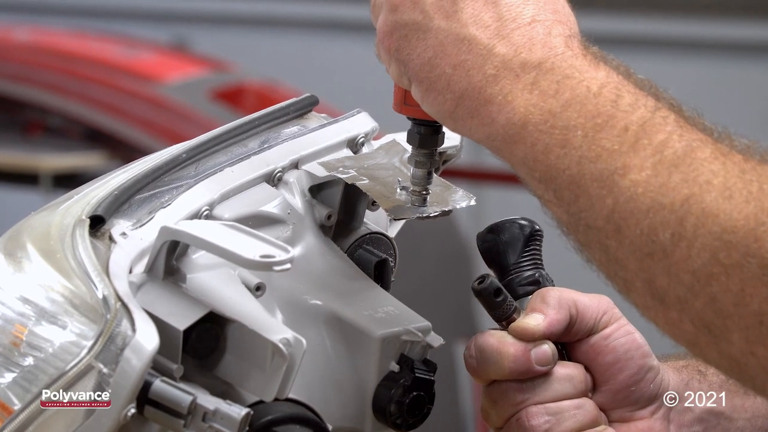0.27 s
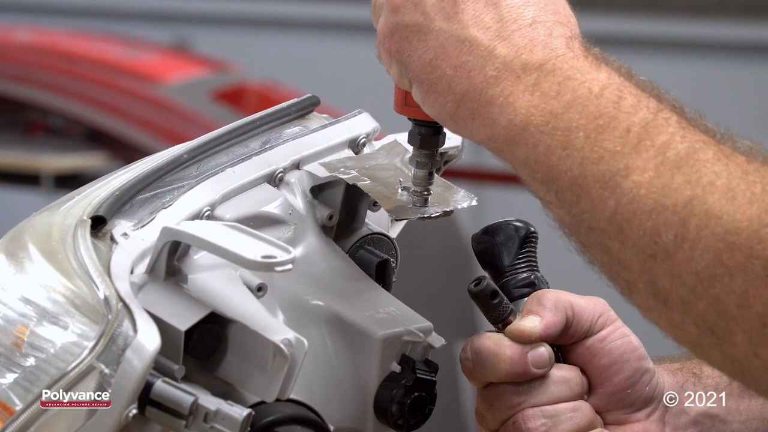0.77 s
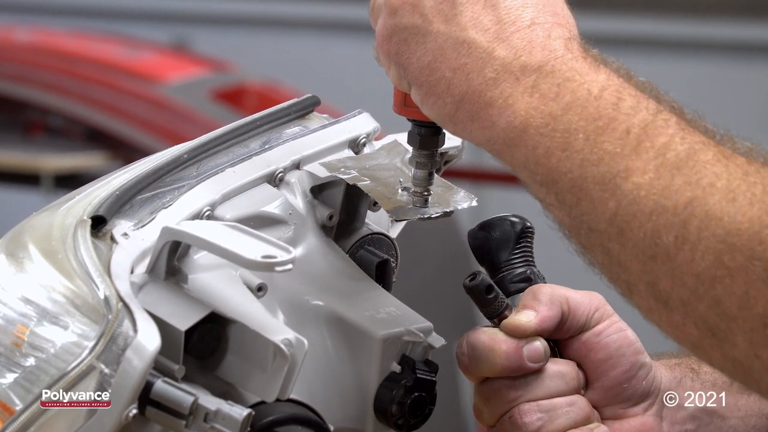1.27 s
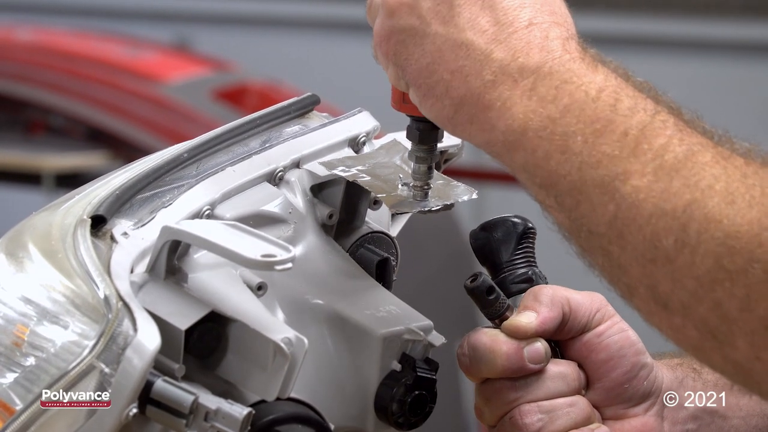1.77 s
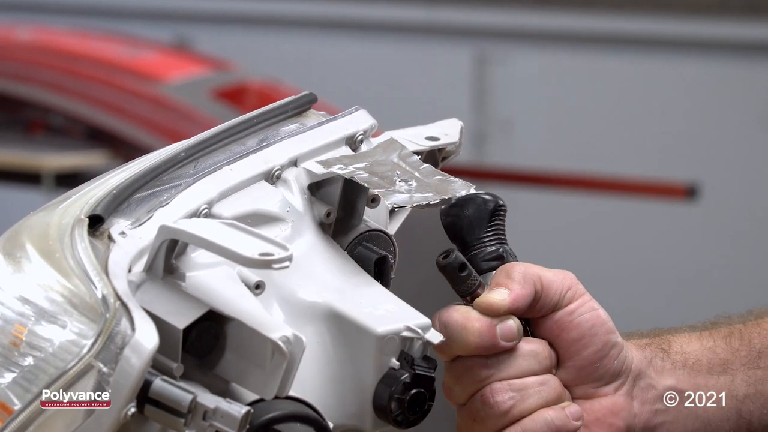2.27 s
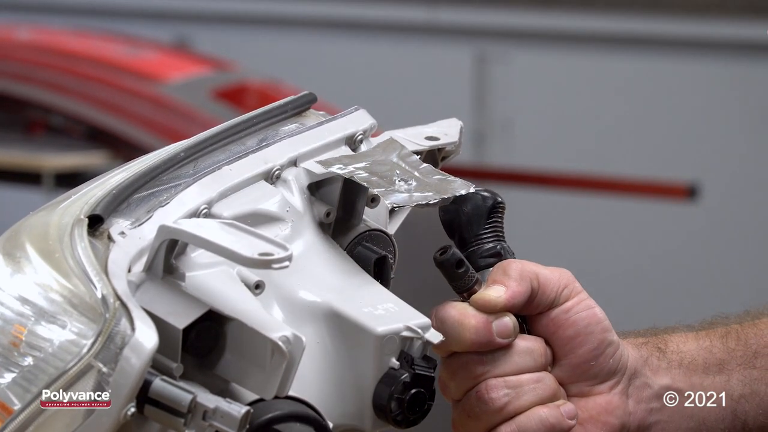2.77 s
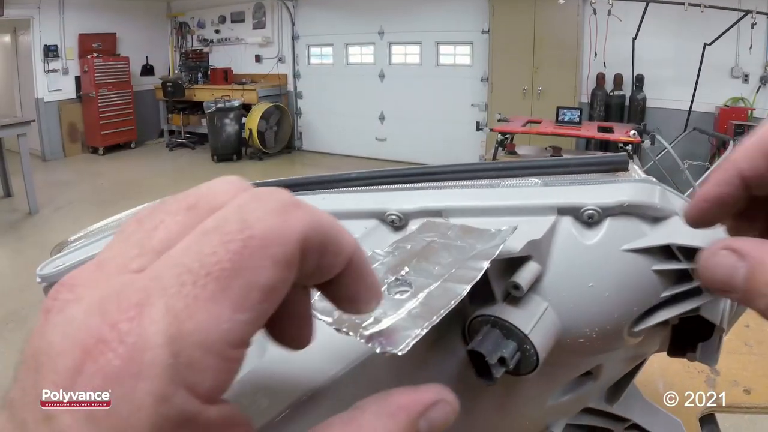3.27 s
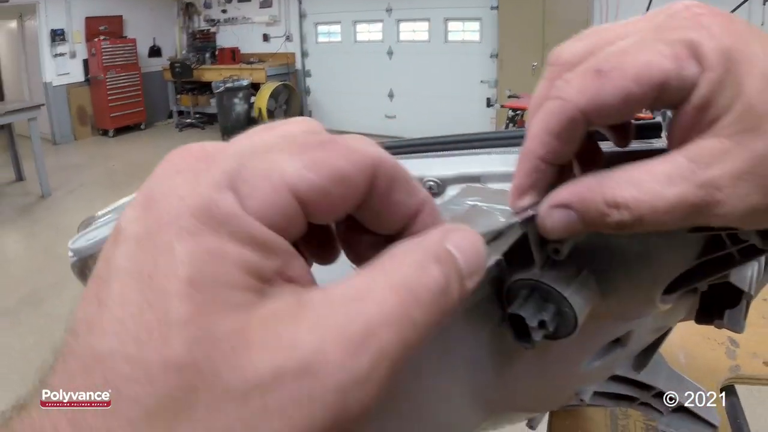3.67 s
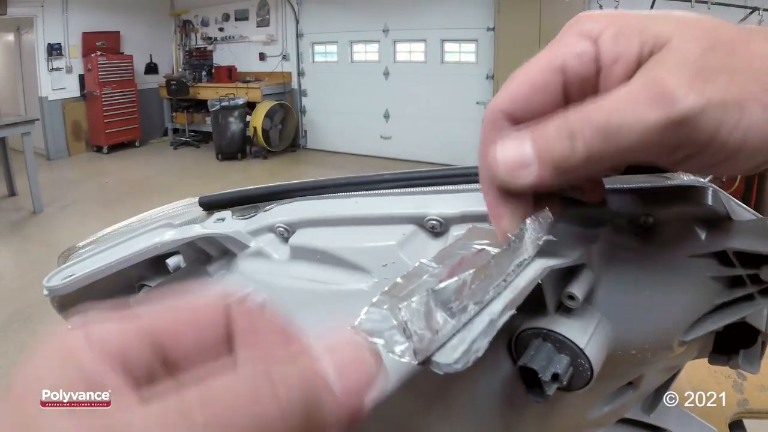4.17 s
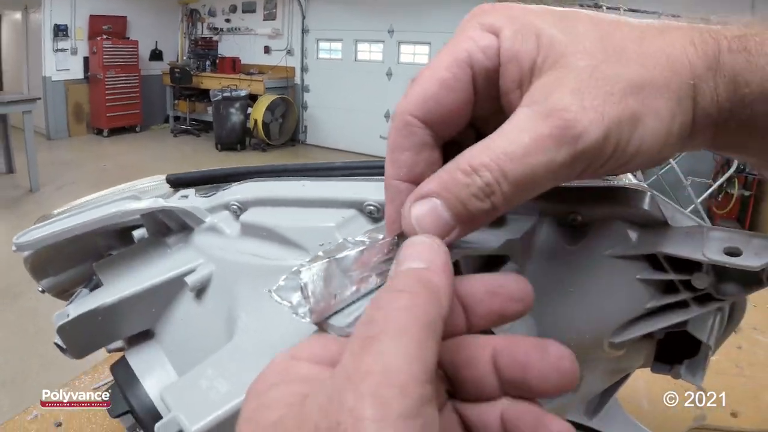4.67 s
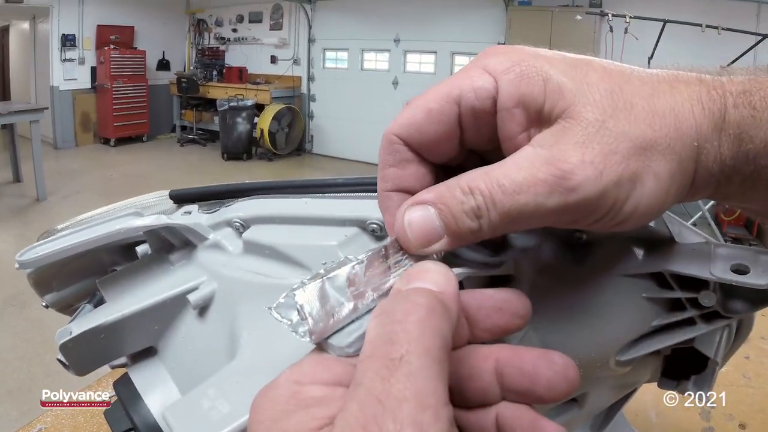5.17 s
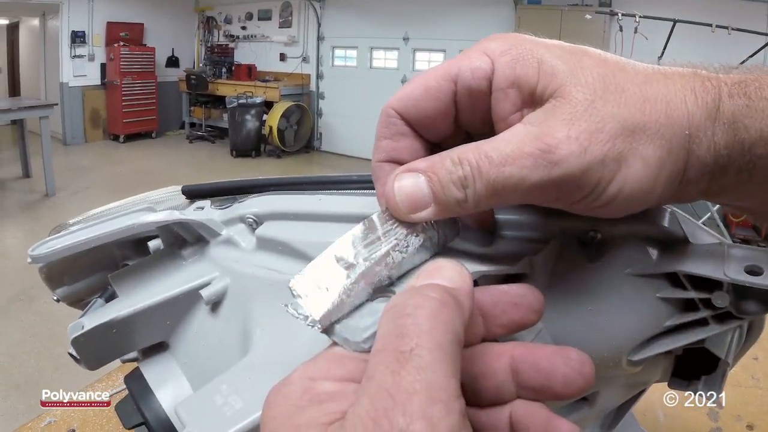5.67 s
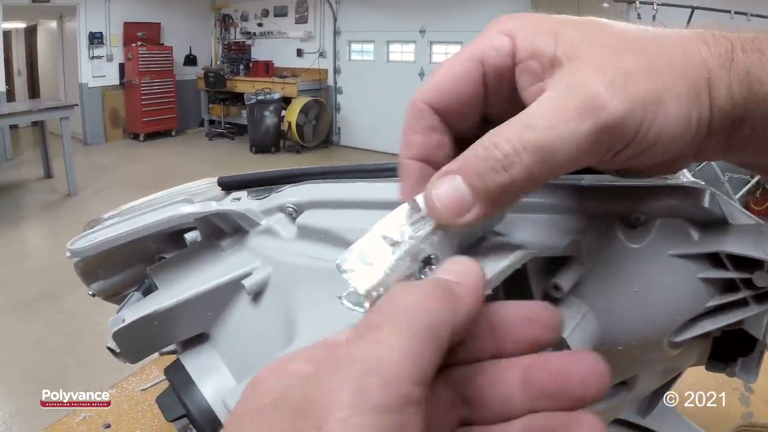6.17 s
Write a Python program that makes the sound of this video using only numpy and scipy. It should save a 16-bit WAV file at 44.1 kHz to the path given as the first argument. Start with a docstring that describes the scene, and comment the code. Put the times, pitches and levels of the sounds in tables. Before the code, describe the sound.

A blow gun sends a steady, high hiss of compressed air over a repair on a plastic housing, flaring brighter as the jet catches an edge. About halfway through, the hiss fades into the quieter rush and hum of workshop fans. Close by, fingers pick at foil, making a few sharp snaps, light knocks on the plastic and dull rubs. Near the end a fingertip scrapes briefly, followed by more small clicks.

```python
"""Compressed air hisses from a blow gun over a foil-backed repair on a plastic headlight housing;
the turbulent jet splashes on the repair and flares where it catches an edge.
At about 3 s the hiss fades into the steady rush and hum of a workshop's fans and machines.
Then fingers pick at the foil: it buckles in snaps, taps ring the housing's modes, hands rub it,
and near 6 s a fingertip scrapes along it by stick-slip friction."""
import sys
import numpy as np
from scipy import signal
from scipy.fft import rfft, irfft
from scipy.io import wavfile

SR = 44100
rng = np.random.default_rng(int(sys.argv[2]) if len(sys.argv) > 2 else 0)


def master(y):
    """Save y as 16-bit WAV."""
    cut = np.clip(np.atleast_2d(y).T, -1, 1)
    pcm = np.round(cut * 32767)  # scale
    wavfile.write(sys.argv[1], SR, pcm.astype(np.int16))


N = 284004
T = np.arange(N) / SR
HZ = np.fft.rfftfreq(N, 1 / SR)


def gain_of(db):
    """Amplitude ratio of a level in decibels."""
    return 10 ** (np.asarray(db) / 20)


def unit_rms(x):
    """Normalisation to rms 1."""
    return x / np.sqrt(np.mean(x ** 2) + 1e-20)


def colour(points):
    """Spectral envelope in dB, interpolated over log frequency."""
    hz, db = np.transpose(points)
    return np.interp(np.log(HZ + 1), np.log(hz), db)


def resonances(peaks, width_hz):
    """Narrow resonances as Lorentzian bumps on a dB spectrum."""
    return sum(db / (1 + (2 * (HZ - hz) / width_hz) ** 2) for hz, db in peaks)


def noise(spectrum_db):
    """Spectrally shaped Gaussian noise of rms 1."""
    return unit_rms(irfft(rfft(rng.standard_normal(N)) * gain_of(spectrum_db), N))


def drift(rate_hz):
    """Slow random modulation: low-pass noise of rms 1."""
    return noise(-10 * np.log10(1 + (HZ / rate_hz) ** 4))


def band(x, low_hz, top_hz):
    """A gentle Butterworth band-pass."""
    return signal.sosfilt(signal.butter(2, [low_hz, top_hz], "band", fs=SR, output="sos"), x)


def stroke(start_s, length_s, attack_s, release_s):
    """Smooth envelope within 0 to 1: attack from the start, release after the length."""
    edge = np.clip(np.minimum((T - start_s) / attack_s, 1 - (T - start_s - length_s) / release_s), 0, 1)
    return edge * edge * (3 - 2 * edge)


def add(mix, start_s, sound):
    """Superposition of a sound on the mix."""
    part = mix[round(start_s * SR):][:len(sound)]
    part += sound[:len(part)]


def ring(modes):
    """Impulse response as a sum of damped modes."""
    t = T[:SR // 8]
    return sum(gain_of(db - 60 * t / t60_s) * np.sin(2 * np.pi * hz * t) for hz, db, t60_s in modes)


def reflections(level_db, t60_s, top_hz, count=150):
    """Transfer function of the direct sound plus scattered, dulled echoes from 8 ms on."""
    delay_s = rng.random(count) * t60_s / 2
    sign = rng.choice([-1, 1], count)
    echoes = np.zeros(N)
    echoes[((delay_s + .008) * SR).astype(int)] = sign * np.exp(-np.log(1000) * delay_s / t60_s)
    return 1 + gain_of(level_db) * rfft(echoes) / np.linalg.norm(echoes) / (1 + 1j * HZ / top_hz)


def side_rumble(level_db=-76.5):
    """Faint low noise that gives width when fed to the two channels in antiphase."""
    return noise(colour([(10, -6), (30, -2), (100, -14), (400, -32), (1200, -41.5)])) * gain_of(level_db)


def motor_hum():
    """Motor tones waver by random phase and amplitude modulation."""
    # hum partials: pitch_hz, level_db
    partials = [(87, -67), (179, -70.5), (339, -69.5)]
    hum = np.zeros(N)
    for hz, db in partials:
        tone = unit_rms(np.cos(2 * np.pi * hz * T + 1.6 * drift(rate_hz=4.3)))
        hum += gain_of(db) * tone * gain_of(1.7 * drift(rate_hz=5))
    return hum


def fans(rest_db=-45.5):
    """Broadband noise of fans and machines, coloured by resonances and echoes, slowly swelling."""
    # spectrum of the rush: frequency_hz, density_db
    spectrum = [(8, -18), (24, -2.5), (140, -3.5), (330, -1), (500, -4), (640, -3), (950, 1.5),
                (1400, -1.5), (2400, 2), (2800, -3), (3400, -.5), (4600, -7.5), (9000, -15.5),
                (12000, -19.5), (15800, -19)]
    # its narrow resonances: frequency_hz, lift_db
    peaks = [(444, 7), (495, 4), (791, 3.5), (937, 3.5), (1002, -2), (1175, 5.5), (1214, 2.5), (1478, 6.5),
             (1672, 7), (1811, 4), (1890, 6.5), (2159, 1), (2288, 4.5), (2358, 5.5), (2396, 6.5), (2436, 5),
             (2770, 0), (3068, 10.5), (3243, 6.5), (3305, 4), (3480, 5), (3529, 5), (3739, -1), (3916, 6.5),
             (4810, 6.5)]
    # its swells, which may overlap: start_s, length_s, lift_db
    swells = [(3.25, 1.27, 2.5), (3.8, 0.68, 1.75), (4.78, 0.59, 2.5), (5.706, 0.8, 3)]
    echoes_db = 20 * np.log10(abs(reflections(level_db=-7.5, t60_s=.2, top_hz=4030)))
    rush = noise(colour(spectrum) + resonances(peaks, width_hz=14.4) + echoes_db) * gain_of(rest_db)
    swell_db = sum(db * stroke(s, length, attack_s=0.38, release_s=0.17) for s, length, db in swells)
    # the midrange swells most; rumble and top hiss follow only in part
    middle = irfft(rfft(rush) / (1 + (np.log(HZ / 1700 + 1e-9) / 1.1) ** 4), N)
    rush = middle * gain_of(swell_db) + (rush - middle) * gain_of(0.3 * swell_db)
    return rush * gain_of(0.35 * drift(rate_hz=20))


def hand_rubs():
    """Sliding friction of hands on the housing: dull, uneven noise that follows the pressure."""
    # spectrum of a rub: frequency_hz, density_db
    spectrum = [(60, -12), (170, -12), (260, -4), (380, -3), (500, 5.5), (650, -11), (1050, -7),
                (1600, -15), (4000, -34)]
    # hand movements: start_s, length_s, level_db
    rubs = [(3.777, 0.11, -54), (4.14, 0.44, -60), (5.25, 0.1, -54), (6.045, 0.058, -45.5),
            (6.1, 0.22, -58)]
    pressure = sum(gain_of(db) * stroke(s, length, attack_s=0.058, release_s=0.086)
                   for s, length, db in rubs)
    return noise(colour(spectrum)) * pressure * gain_of(drift(rate_hz=34))


def fingertip_scrape(slips_per_s=900, level_db=-41.5):
    """Stick-slip friction: random slips excite the housing as a fingertip presses, then slides off."""
    # resonances of the scrape: frequency_hz, width_hz, gain_db
    peaks = [(870, 230, -0.5), (988, 91, -5), (1266, 88, -3), (1915, 130, -1.5), (2090, 220, -3)]
    slips = rng.standard_normal(N) * (rng.random(N) < slips_per_s / SR)
    body = sum(gain_of(db) / (1 + 2j * (HZ - hz) / width) ** 2 for hz, width, db in peaks)
    pressure = stroke(start_s=5.915, length_s=0.14, attack_s=0.09, release_s=0.13)
    return unit_rms(irfft(rfft(slips) * body, N)) * gain_of(level_db) * pressure


def housing_taps():
    """Impacts excite the plastic shell's modes; a softer contact low-passes the blow."""
    # modes of the housing: frequency_hz, relative_db, t60_s
    modes = [(535, -24, 0.062), (810, -24, 0.027), (1093, 3, 0.025), (1440, 0.5, 0.018), (1920, 4.5, 0.014),
             (2300, 3.5, 0.02), (6500, -5, .008), (9300, -13, .006)]
    # finger knocks: start_s, peak_db, cutoff_hz
    taps = [(4.065, -18.5, 5000), (4.071, -30, 1200), (4.1825, -34, 2000), (4.1866, -28, 1500),
            (4.3294, -24.5, 1200), (6.0497, -30, 6000), (6.0705, -33, 1200), (6.0922, -46, 5000),
            (6.0932, -20, 1000)]
    body = band(ring(modes), low_hz=600, top_hz=12000)  # a thin shell radiates little bass
    out = np.zeros(N)
    for start_s, peak_db, cutoff_hz in taps:
        pole = np.exp(-2 * np.pi * cutoff_hz / SR)
        knock = signal.lfilter([1 - pole], [1, -pole], body)
        add(out, start_s, gain_of(peak_db) * knock / abs(knock).max())
    return out


def foil_snaps():
    """Buckling of the peeled foil excites bright, heavily damped modes."""
    # modes of the foil: frequency_hz, relative_db, t60_s
    modes = [(1700, -27, 0.004), (2520, -19, 0.0037), (3900, 1, 0.0076), (5000, 5.5, 0.0033),
             (5400, -15, 0.012), (5960, -5, 0.017), (6260, 0, 0.0059), (8080, 2.5, 0.0056),
             (8900, -20, .014), (9600, -20, .003)]
    # buckling events: start_s, peak_db
    snaps = [(3.598, -41), (4.0647, -33), (4.3247, -21), (4.329, -11.5), (4.3297, -13.5), (4.3305, -24),
             (4.4055, -31.5), (5.066, -39), (5.903, -39), (6.092, -27.5), (6.0933, -30), (6.2798, -32),
             (6.424, -31)]
    snap = band(ring(modes), low_hz=815, top_hz=9600)
    out = np.zeros(N)
    for start_s, peak_db in snaps:
        add(out, start_s, gain_of(peak_db) * snap / abs(snap).max())
    return out


def flutter(drive_db=-51.0, decay_s=0.0012):
    """A band-limited pulse train: faint, soft ticks under the hiss, one in five coming early."""
    timing, sizes, sides = rng.random((80, 3)).T
    times_s = np.cumsum(np.where(timing < .2, .032, .0427))
    tick = np.exp(-T[:SR // 30] / decay_s)
    out = np.zeros(N)
    for start_s, size, side in zip(times_s, sizes, sides):
        add(out, start_s, np.sign(side - .5) * tick * gain_of(drive_db + 2.6 * size))
    return band(out, low_hz=78, top_hz=850)


def free_jet(hollows_db, flare_db):
    """Turbulent mixing noise: a rush coloured by the housing's hollows, and a high nozzle hiss."""
    # spectrum of the rush: frequency_hz, density_db
    rush_spectrum = [(20, -50), (70, -32.5), (300, -33.5), (550, -24.5), (700, -24.5), (860, -18),
                     (1150, -19), (1600, -10.5), (2050, -6.5), (2450, 0), (3200, 0.4), (3550, -3.5),
                     (4150, -4.5), (4700, -46)]
    # spectrum of the nozzle hiss: frequency_hz, density_db
    nozzle_spectrum = [(7000, -31.5), (10500, -10), (11500, -7.5), (12600, -4), (13700, 1.5), (15850, 0),
                       (16200, -50)]
    # course of the jet: time_s, rush_relative_db, nozzle_relative_db
    course = [(0.0, -41, -39), (1.19, -43, -37), (1.43, -44, -40), (1.77, -42.5, -40), (1.96, -44, -41.5),
              (2.04, -42.5, -38.5), (2.12, -47.5, -40.5), (2.43, -44.5, -39), (3.02, -48, -39)]
    time_s, rush_db, nozzle_db = np.transpose(course)
    rush = noise(colour(rush_spectrum) + hollows_db) * gain_of(2 + np.interp(T, time_s, rush_db))
    nozzle_gain = gain_of(1.5 + np.interp(T, time_s, nozzle_db) + 0.15 * flare_db)
    return rush + noise(colour(nozzle_spectrum)) * nozzle_gain


def splash(hollows_db, flare_db, fine_flare_db, base_db=-30.5, sag_db_per_s=1.4):
    """Impingement noise of the jet on the repair: it sinks slowly while its fine top gains in share."""
    # spectrum of the splash: frequency_hz, density_db
    spectrum = [(2000, -48), (3700, -15), (4300, -7), (4570, 0), (5200, 0.5), (6500, .5), (7300, -3),
                (8000, -4), (8700, -9.5), (9450, -7.5), (10300, -13.5), (11200, -21), (16000, -22)]
    bottom_hz, fine_hz, fine_rise_db_per_s = 5470, 7450, 0.88
    shape_db = colour(spectrum) + hollows_db
    fine_share = np.clip(1 / (1 + (fine_hz / (HZ + 1)) ** 20), 1e-6, 1 - 1e-6)
    coarse = noise(shape_db + 10 * np.log10(1 - fine_share))
    bottom = irfft(rfft(coarse) / (1 + (HZ / bottom_hz) ** 20), N)
    fine = noise(shape_db + 10 * np.log10(fine_share))
    fine *= gain_of(-9.5 + fine_rise_db_per_s * T + fine_flare_db)
    # an edge sheds finer eddies, which lift the top more than the bottom
    hiss = bottom * gain_of(0.61 * flare_db) + (coarse - bottom + fine) * gain_of(flare_db)
    waver_db = 0.29 * drift(rate_hz=70) + 0.35 * drift(rate_hz=9.9)
    return hiss * gain_of(base_db - sag_db_per_s * T + waver_db)


def blow_gun():
    """The jet and its splash excite the housing's cavity resonances and flare at the repair's edges."""
    # the jet catching an edge: start_s, rise_s, length_s, lift_db, extra_fine_db
    flares = [(-0.05, 0.04, 0.43, 0.5, 1), (1.062, 0.018, 0.15, 6, 3), (1.28, 0.012, 0.022, 7, 2),
              (1.42, 0.05, 0.42, 2.5, 1), (1.74, 0.06, 0.06, 2.5, -1), (1.999, 0.05, 0.055, 5.5, 3),
              (2.36, 0.072, 0.79, 4, 0.9), (2.62, 0.09, 0.14, 0.9, 4), (2.94, 0.06, 0.28, 3, 5)]
    # cavity resonances in the air stream: frequency_hz, lift_db
    cavities = [(2272, 3), (2670, 4), (3208, 4.5), (3284, 4), (4011, 6), (4081, 5), (4225, 5), (4572, 2.5),
                (4657, 4.5), (5060, 5), (5584, 2.5), (6348, 1), (6638, 1), (7483, 4.5), (7903, 4),
                (8215, 2.5), (8398, 4), (8823, 3), (9053, 4), (9390, 9), (10126, 7)]
    flare_db, fine_flare_db = np.zeros(N), np.zeros(N)
    for start_s, rise_s, length_s, lift_db, extra_fine_db in flares:
        caught = stroke(start_s, length_s, rise_s, release_s=0.08)
        flare_db += lift_db * caught
        fine_flare_db += extra_fine_db * caught
    echoes_db = 20 * np.log10(abs(reflections(level_db=-14.5, t60_s=.08, top_hz=9000)))
    hollows_db = resonances(cavities, width_hz=31) + echoes_db
    return free_jet(hollows_db, flare_db) + splash(hollows_db, flare_db, fine_flare_db)


def scene(fade_start_s=2.949, fade_length_s=0.3):
    """An equal-power crossfade from the air to the workshop; all is centred but the side rumble."""
    echoes = reflections(level_db=-20.0, t60_s=.05, top_hz=7000)
    touches = irfft(rfft(housing_taps() + foil_snaps()) * echoes, N)
    fade = np.pi / 2 * np.clip((T - fade_start_s) / fade_length_s, 0, 1)
    blowing = (blow_gun() + flutter()) * np.cos(fade)
    workshop = (fans() + motor_hum() + fingertip_scrape() + hand_rubs()) * np.sin(fade)
    side = side_rumble() * np.sin(fade)
    mid = blowing + workshop + touches
    return np.array([mid + side, mid - side])


def record(dry):
    """Band limiting by a steep linear-phase low-pass."""
    low_pass = signal.firwin(1023, cutoff=15850, window=("kaiser", 9), fs=SR)
    return signal.oaconvolve(dry, low_pass[None], "same")


dry = scene()
out = record(dry)
master(out)
```